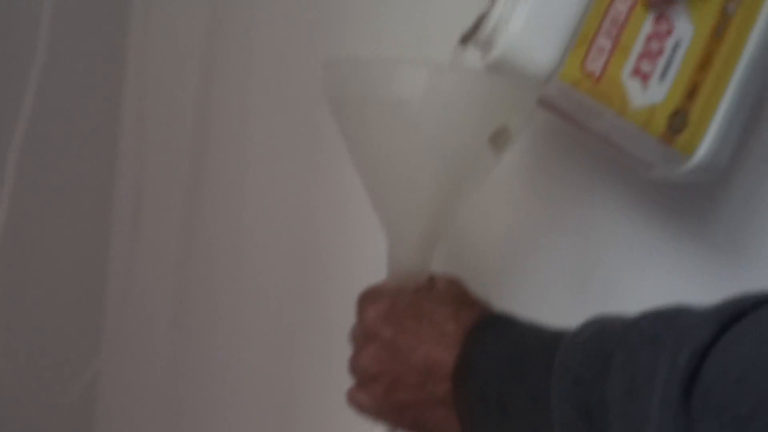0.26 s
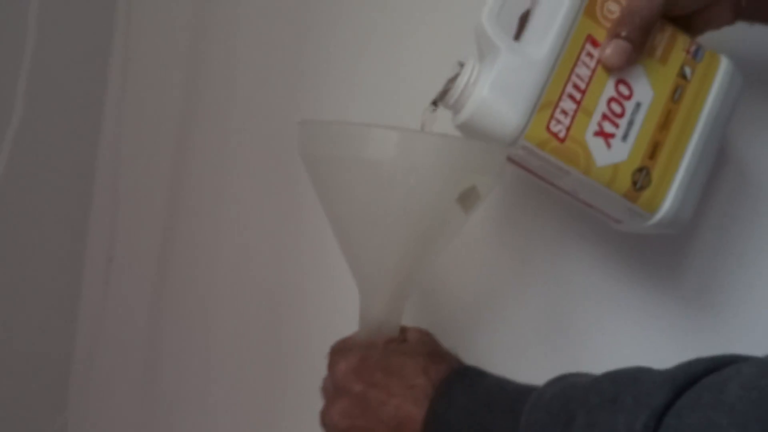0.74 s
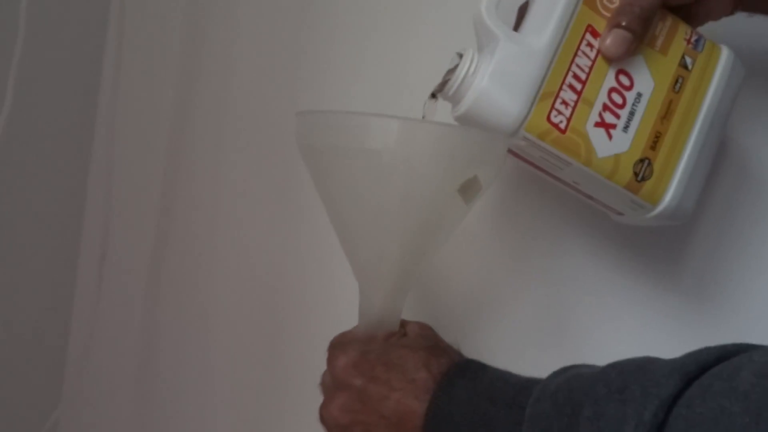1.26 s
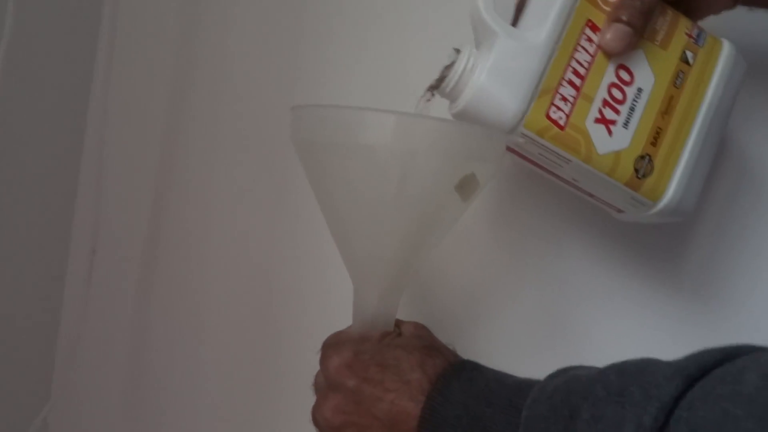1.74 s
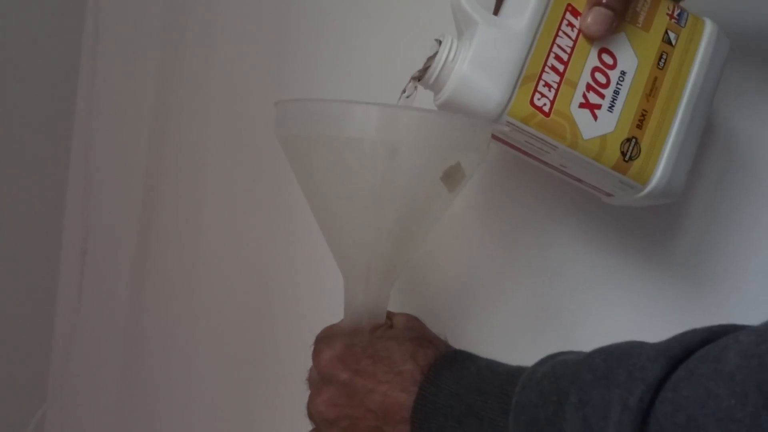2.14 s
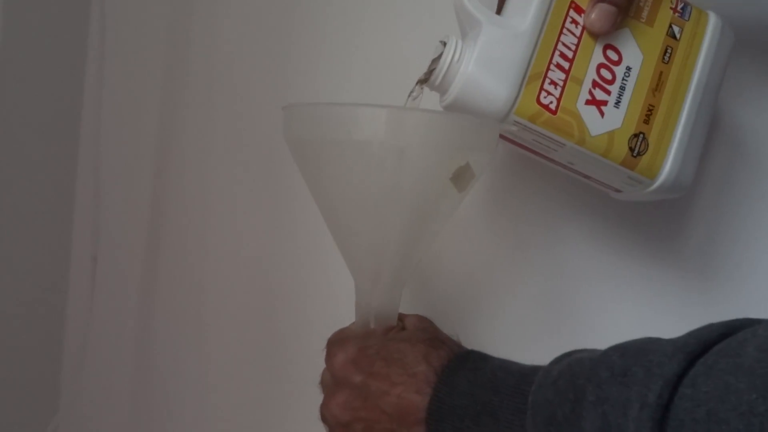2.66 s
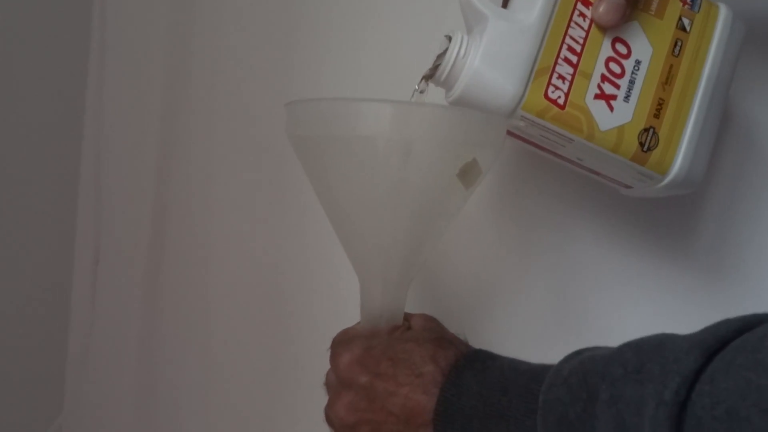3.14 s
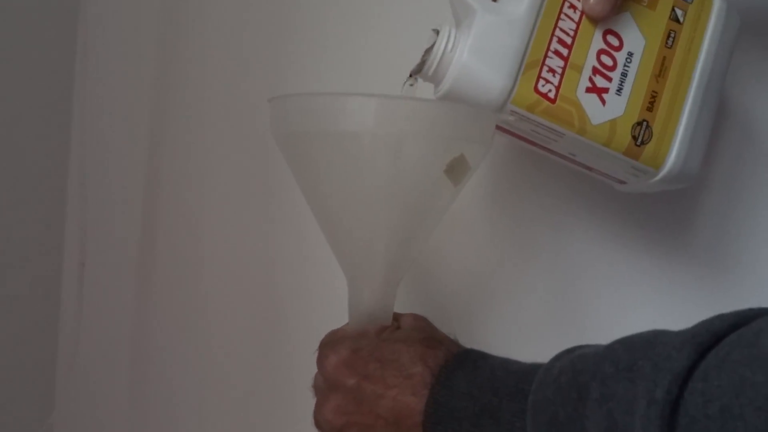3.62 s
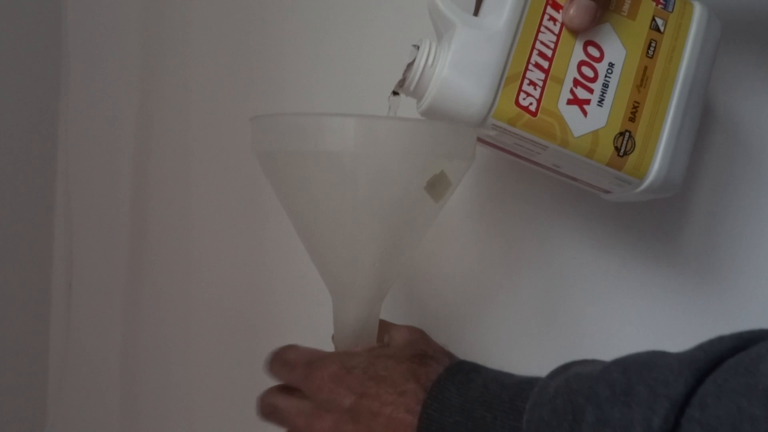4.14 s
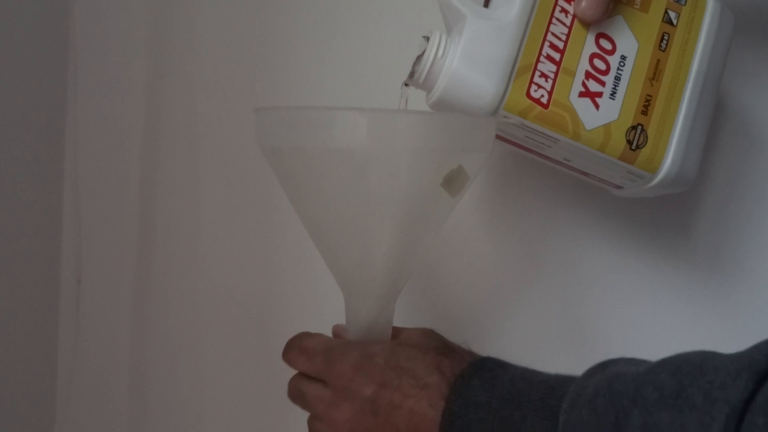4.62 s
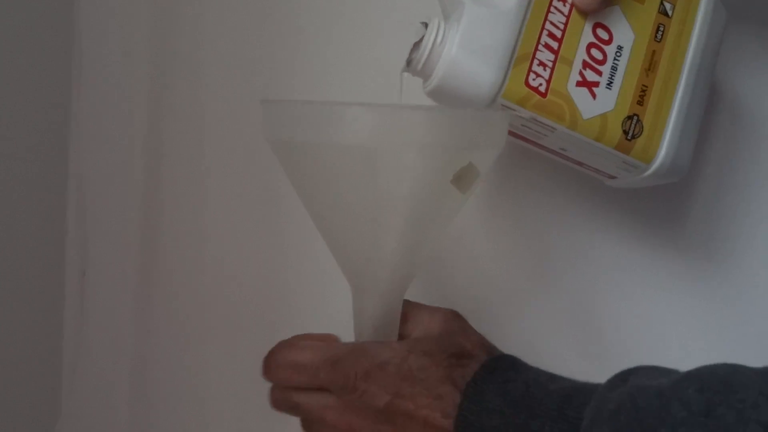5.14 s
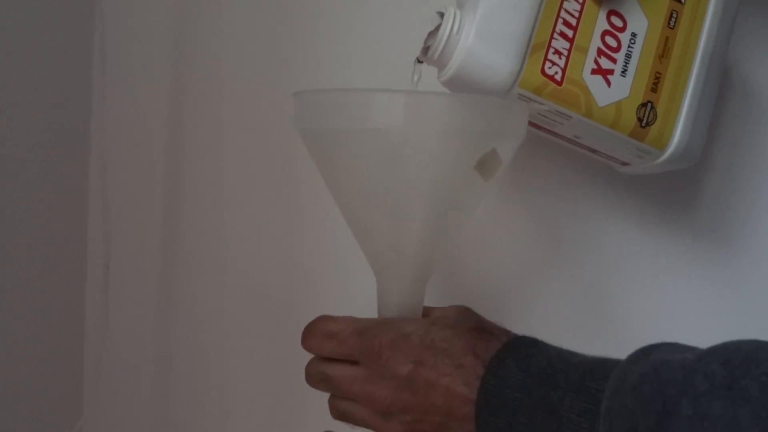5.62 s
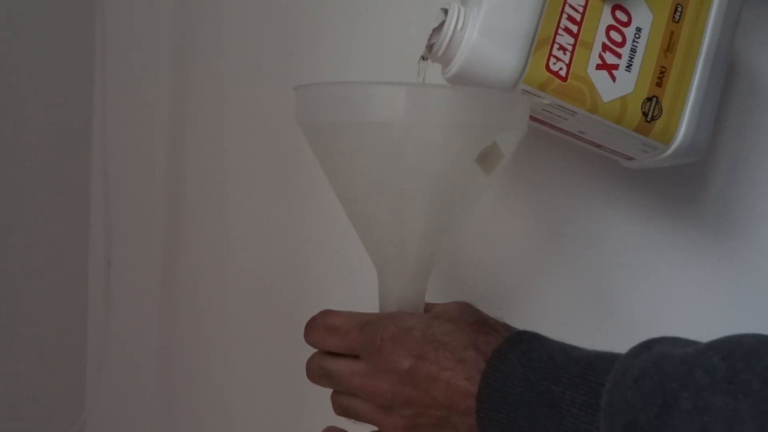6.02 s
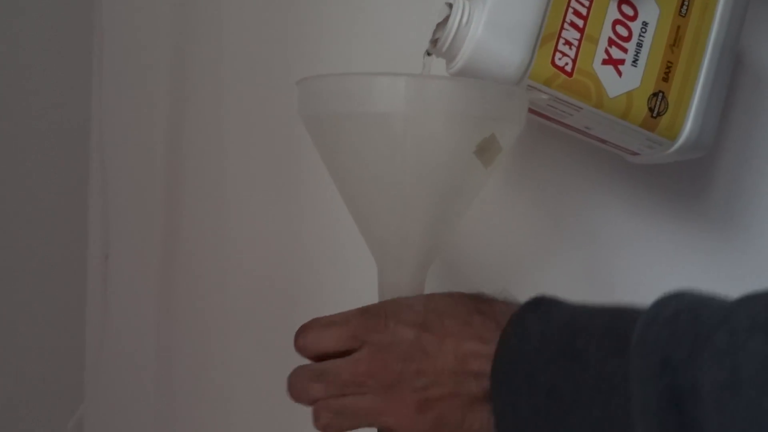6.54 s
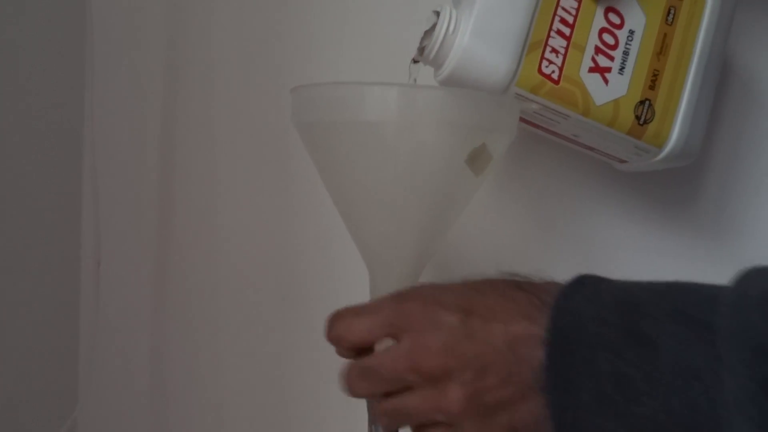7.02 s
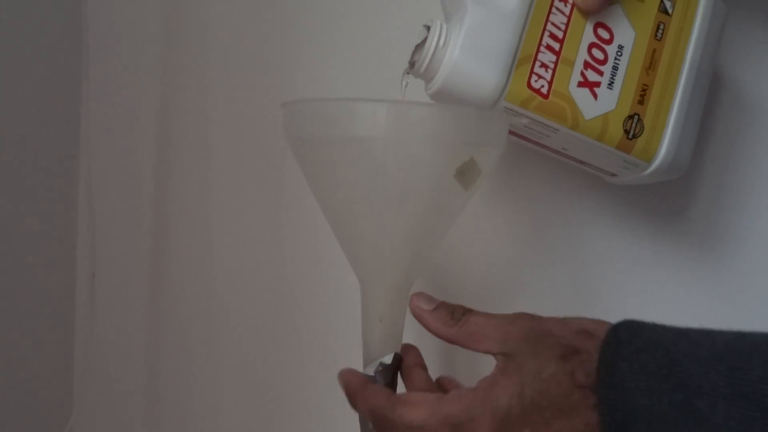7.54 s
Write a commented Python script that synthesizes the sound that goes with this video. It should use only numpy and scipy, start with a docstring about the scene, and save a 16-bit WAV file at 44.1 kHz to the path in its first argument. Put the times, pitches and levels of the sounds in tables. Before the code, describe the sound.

In a small room, close up and almost mono, liquid runs through a thin plastic funnel into a pipe. From 0 to 1 s there is a soft trickle with fine bright ticks and a clearer gulp near 1 s. Sparse bubbling and a steady faint wash continue to 2.7 s, with pings around 2 and 2.3 s and a light hand rub near 2.3. From 2.9 to 3.6 s hollow bubbles quicken into a livelier cluster. A last gurgle comes near 4 s, then dull grip knocks at 4.2-4.4 s. Until 5.3 s it is nearly silent, with only faint gurgles. At 5.4 s air breaks through in the loudest gurgle, with soft low thumps, then dense gulps and crisp plinks run to about 6.6 s. A lull follows; at 7.0-7.5 s shorter glugs, a rub and low nudges return, thinning to scattered drips by 7.8 s.

```python
"""Glugs, gurgles and fine ticking come first: liquid runs from a plastic bottle into a hand-held funnel and down
a pipe into a radiator, in a small room. Bubbles are damped sines, singly or in swarms. Air gulps back up the neck,
stops while the funnel backs up, then breaks through louder. The hand slides and knocks, as shaped noise and short
rings; slugs of liquid nudge low resonances. A wall close by echoes the bubbles, and the microphones hear it nearly mono."""
import sys
import numpy as np
from scipy import signal
from scipy.fft import rfft, irfft, next_fast_len
from scipy.io import wavfile
from scipy.ndimage import map_coordinates

SR = 44100
rng = np.random.default_rng(int(sys.argv[2]) if len(sys.argv) > 2 else 0)


def output_pcm(signal):
    """Save a mono or channel-first signal as 16-bit PCM at the path in sys.argv[1].

    Samples are clipped to [-1, 1] before scaling.
    """
    pcm = np.clip(np.atleast_2d(signal).T, -1, 1) * 32767
    wavfile.write(sys.argv[1], SR, np.round(pcm).astype(np.int16))


N = 343098
TOP_HZ = 15900  # upper band limit


def amp(db):
    """Decibels to gain."""
    return 10 ** (np.asarray(db) / 20)


def unit(x):
    """x at rms 1."""
    return x / np.sqrt(np.mean(x ** 2) + 1e-20)


def along(points, hz):
    """Interpolate (Hz, value) points on a log frequency axis."""
    f, v = np.transpose(points)
    return np.interp(np.log(hz + 1), np.log(f + 1), v)


def curves(rows):
    """One value per sample for each column after the time."""
    s, *cols = np.transpose(rows)
    return [np.interp(np.arange(N) / SR, s, c) for c in cols]


def wobble(rate):
    """A random curve of straight pieces, rate knots a second."""
    knots = rng.standard_normal(int(N * rate / SR) + 4)
    return map_coordinates(knots, [np.arange(N) * rate / SR], order=1)


def envelope(start, length, attack, release, sag_db):
    """A gain that rises, holds with a slight sag, then dies away."""
    t = np.arange(N) / SR - start
    rise = np.clip(t / attack, 0, 1)
    sag = amp(-sag_db * np.clip(t / length, 0, 1))
    return rise * sag * np.exp(-np.maximum(t - length, 0) / release)


def filtered(x, response):
    """x times a complex response of frequency."""
    m = next_fast_len(N + SR // 2)
    return irfft(rfft(x, m) * response(np.fft.rfftfreq(m, 1 / SR)), m)[..., :N]


def coloured(x, spectrum):
    """x shaped by (Hz, dB) points, at rms 1."""
    return unit(filtered(x, lambda hz: amp(along(spectrum, hz))))


def resonance(f, hz, width):
    """Response of one causal resonance, 1 at its centre."""
    return 1j * f * width / (hz * hz - f * f + 1j * f * width)


def add(track, s, sound):
    """Mix a sound into a track at time s."""
    start = int(np.clip(round(s * SR), 0, N - 1))
    track[start:start + len(sound)] += sound[:N - start]


def bubbles(times, gains, hz, cycles, size, swell=1):
    """Damped sines of given peaks: swell and decay are in cycles, size in samples; each rises a little in pitch."""
    turns = hz[:, None] * np.arange(size) / SR
    age = turns / np.reshape(cycles, (-1, 1))
    rise = 1 + .035 * age / (1 + age)
    onset = turns ** 2 / (swell ** 2 + turns ** 2)
    ring = np.sin(2 * np.pi * turns * rise) * np.exp(-age) * onset
    ring *= (gains / (np.abs(ring).max(axis=1) + 1e-9))[:, None]
    where = np.abs(times * SR).astype(int)[:, None] + np.arange(size)
    return np.bincount(where.ravel(), ring.ravel(), N)[:N]


def swarm(hz, spread, cycles, scatter_db, count, size):
    """A stream of short-lived bubbles of random size around a pitch (spread in octaves), at rms 1."""
    times = (np.arange(count) + rng.random(count)) / count * (N - 1) / SR
    pitch, life, strength = rng.standard_normal((count, 3)).T
    centre = np.broadcast_to(hz, N)[(times * SR).astype(int)]
    pitches = np.minimum(centre * 2 ** (spread * np.clip(pitch, -2, 2)), TOP_HZ)
    gains = amp(scatter_db * np.minimum(strength, 1.7))
    return unit(bubbles(times, gains, pitches, cycles * 2 ** (life / 4), size, swell=cycles))


# The quiet air of the place. Each row: frequency in Hz, relative density in dB per Hz.
AIR_SPECTRUM = [(12, -50), (20, -28), (25, -40), (37, -1), (70, -1.5), (98, 0.5), (123, -4.5), (149, 0.5),
                (203, -3), (254, -15), (326, -9), (469, -9.5), (713, -7), (4250, -21), (15800, -31)]


def air():
    """Steady noise in the colour of the quiet air around the microphones."""
    return amp(-57.5) * coloured(rng.standard_normal(N), AIR_SPECTRUM)


# Decay of the small room. Each row: frequency in Hz, time to fall by 60 dB in seconds.
ROOM_DECAY = [(150, 0.55), (1000, 0.35), (4000, 0.49), (12000, 0.05)]


def room(x):
    """A diffuse tail whose highest treble dies first; it changes as the pouring arm moves."""
    hz, t, z = signal.stft(rng.standard_normal((4, SR // 3)), SR, nperseg=256)
    decay = amp(-60 * t / along(ROOM_DECAY, hz)[:, None])
    tails = signal.istft(z * decay, SR, nperseg=256)[1]
    delay = int(0.0044 * SR)
    tails = np.pad(tails / np.linalg.norm(tails[0]), ((0, 0), (delay, 0)))
    # four tails take turns, once round a second
    turn = 2 * np.pi * (np.arange(N) / SR + np.arange(len(tails))[:, None] / len(tails))
    return signal.oaconvolve(x * np.maximum(np.cos(turn), 0), tails, axes=1).sum(axis=0)[:N]


# Surfaces close to the funnel. Each row: echo delay in seconds before the sway, linear gain.
NEAR_WALLS = [(.0022, .12), (.00775, .52), (.0131, .1)]
WALL_DRIFT = .015  # typical share by which the paths change


def walls(x):
    """Near echoes, their paths changing slightly as the funnel sways."""
    path = 1 + WALL_DRIFT * wobble(3)
    return sum(gain * map_coordinates(x, [np.arange(N) - delay * SR * path], order=1)
               for delay, gain in NEAR_WALLS)


# Air columns of funnel and pipe. Each row: resonance in Hz, time to fall by 60 dB in seconds, relative level in dB.
AIR_COLUMNS = [(170, .3, -3), (308, .25, -5), (411, .2, 0), (618, .1, -1), (779, .15, -7), (825, .1, -3),
               (907, .22, 2), (1037, .1, -8), (1194, .15, 1), (1322, .15, 0), (1449, .12, -4),
               (1802, .12, -7), (1927, .12, -5), (2170, .12, -2), (2335, .15, -5), (2543, .12, -3)]
# Bands that the cone swallows. Each row: centre in Hz, width in Hz, share lost at the centre.
CONE_HOLLOWS = [(3045, 150, 0.74), (4110, 180, 0.77)]


def pipe(x):
    """The air columns ring on after each bubble, and the nearest walls throw it back."""
    def columns(f):
        return sum(amp(db + 1.0) * resonance(f, hz, np.log(1000) / (np.pi * t60)) for hz, t60, db in AIR_COLUMNS)

    def hollows(f):
        return sum(lost * resonance(f, hz, width) for hz, width, lost in CONE_HOLLOWS)

    return filtered(x + filtered(x, columns) + walls(x), lambda f: 1 - hollows(f))


# Hand and sleeve sliding on the funnel. Each row: start in seconds, length in seconds, relative level in dB.
HAND_SLIDES = [(2.325, 0.12, -55.5), (2.469, 0.084, -68), (4.347, 0.15, -63.5), (7.29, 0.041, -51)]
# Colour of the rub. Each row: frequency in Hz, relative density in dB per Hz.
RUB_SPECTRUM = [(35, -36), (60, 2), (278, 7), (351, -3), (613, 7), (1450, -5.5), (3500, 2), (5080, -4.5),
                (10700, -6.5), (12500, -17), (15500, -31)]


def rub():
    """Skin and cloth drag over the plastic in fine catches."""
    drag = sum(amp(db) * envelope(s, length, attack=0.038, release=0.029, sag_db=6.5)
               for s, length, db in HAND_SLIDES)
    catches = rng.standard_normal(N) * amp(3 * wobble(500) + 2 * wobble(60))
    return amp(20.5) * drag * coloured(catches, RUB_SPECTRUM)


# Dull knocks as the hand shifts its grip. Each row: start in seconds, relative peak in dB, pitch in Hz.
GRIP_KNOCKS = [(4.24, -30, 884), (4.432, -17.5, 1050), (4.437, -19.5, 1055)]


def knocks():
    """The hand damps the plastic, so each knock dies at once."""
    s, db, hz = np.transpose(GRIP_KNOCKS)
    return bubbles(s, amp(db), hz, cycles=1.7, size=900, swell=1.3)


# Heavy slugs of liquid nudging the funnel. Each row: start in seconds, relative level in dB.
SLUG_THUMPS = [(3.984, -34), (5.364, -16), (5.442, -13.5), (6.302, -28), (6.399, -30), (7.345, -21),
               (7.374, -15), (7.422, -18), (7.441, -18), (7.772, -27)]
# Low resonances of funnel and radiator. Each row: centre in Hz, width in Hz, relative level in dB.
BODY_RESONANCES = [(108, 30, -19), (177, 46, -2), (304, 27, -2.5), (456, 33, 17)]


def thumps():
    """Slugs of liquid push softly and shake the low resonances of funnel and radiator."""
    blows = np.zeros(N)
    push = np.hanning(int(.004 * SR))  # 4 ms
    for s, db in SLUG_THUMPS:
        add(blows, s, amp(db + 42) * push / push.sum())

    def body(f):  # neighbouring resonances have opposite signs
        return sum((-1) ** k * amp(db) * resonance(f, hz, width)
                   for k, (hz, width, db) in enumerate(BODY_RESONANCES))

    return filtered(blows, body)


# Liquid sliding evenly down the cone into the neck. Each row: time in seconds, relative level in dB.
WASH_LEVEL = [(0.0, -54), (0.6, -66), (0.88, -50.5), (1.0, -48), (1.8, -45.5), (2.1, -54.5), (2.5, -42),
              (2.65, -67), (3.6, -57), (3.8, -50), (4.05, -42.5), (4.25, -92), (7.78, -58)]
# Resonances that colour the wash. Each row: centre in Hz, width in Hz, relative level in dB.
NECK_RESONANCES = [(893, 250, 4.5), (1190, 500, -44), (1295, 99, 12), (1970, 1100, 4)]


def wash():
    """Countless faint bubbles merge into a steady wash in the resonances of the neck."""
    wash_db, = curves(WASH_LEVEL)
    grains = swarm(1195, spread=0.73, cycles=0.39, scatter_db=4, count=9000, size=200)
    neck = filtered(grains, lambda f: sum(amp(db) * resonance(f, hz, width) for hz, width, db in NECK_RESONANCES))
    return amp(wash_db) * unit(neck)


# Squeezed air pockets, rising as they shrink. Each row: start in seconds, length in seconds, start pitch in Hz,
# end pitch in Hz, relative level in dB, pitch unsteadiness in octaves.
AIR_SQUEEZES = [(0.109, 0.066, 1510, 2540, -46.5, 0.2), (0.226, 0.23, 1347, 1583, -51.5, .12),
                (1.189, 0.13, 2134, 2600, -44, 0.117), (1.54, 0.09, 1930, 3394, -46, 0.142),
                (1.601, 0.04, 4030, 5270, -48, 0.095), (2.325, 0.047, 3780, 4560, -42, 0.097),
                (2.813, 0.039, 2226, 2320, -47, 0.067), (3.701, 0.074, 218, 810, -47, 0.068),
                (5.327, 0.018, 1810, 1926, -38, 0.034), (5.387, 0.07, 784.6, 1460, -30, 0.066),
                (5.374, 0.12, 2143, 2546, -36, 0.093), (6.287, 0.057, 396, 922, -40.5, 0.038),
                (7.292, 0.02, 826, 1020, -32.5, 0.052), (7.299, 0.044, 1548, 1775, -34, 0.054),
                (7.377, 0.025, 610, 690, -31, 0.038), (7.422, 0.027, 560, 906, -31, 0.043),
                (7.471, 0.071, 792, 969, -41, 0.054), (7.522, 0.28, 938, 1453, -56, 0.12)]


def squeezes():
    """A trapped pocket rings unsteadily and climbs in pitch while liquid closes in on it."""
    track = np.zeros(N)
    for s, length, start_hz, end_hz, db, unsteady in AIR_SQUEEZES:
        u = np.linspace(0, 1, int(length * SR))
        shake, jitter = (map_coordinates(knots, [u * length * 220], mode="mirror")  # 220 knots a second
                         for knots in rng.standard_normal((2, 64)))
        hz = start_hz * (end_hz / start_hz) ** u * 2 ** (unsteady * jitter)
        ring = unit(amp(4 * shake) * np.sin(2 * np.pi * np.cumsum(hz) / SR))
        add(track, s, amp(db) * ring * np.sqrt(np.abs(np.sin(np.pi * u))))
    return track


# Lone bubbles, from deep glugs in the pipe to blips in the neck. Each row: start in seconds, relative peak in dB,
# pitch in Hz.
LONE_BLIPS = [(0.331, -33.5, 2330), (0.546, -43, 2390), (0.636, -39.5, 1230), (0.658, -36.5, 880),
              (1.059, -40, 435), (1.163, -39, 193), (1.259, -25.5, 2200), (1.3, -25.5, 2240),
              (1.325, -34, 2380), (1.364, -38, 208), (1.438, -38.5, 346), (1.578, -39, 450),
              (1.681, -36, 316), (1.756, -38, 344), (1.783, -31, 1230), (2.648, -31.5, 2240),
              (2.685, -36, 2200), (2.713, -34, 2060), (2.838, -31, 2160), (3.089, -27, 1350),
              (3.164, -32, 2440), (3.522, -27, 1390), (3.494, -26, 980), (3.508, -26, 1080),
              (3.562, -24.5, 1120), (2.941, -27.5, 1350), (2.957, -30, 1340), (3.205, -23, 1360),
              (3.256, -25, 1240), (3.316, -22.5, 1400), (3.456, -22.5, 1310), (3.486, -17, 1075),
              (3.501, -23, 2270), (3.969, -26.5, 685), (5.359, -24, 780), (5.375, -24.5, 402),
              (5.388, -19, 725), (5.408, -15, 890), (5.416, -12, 1140), (5.434, -14, 1000),
              (5.44, -19, 1120), (5.447, -22, 625), (5.45, -18.5, 1210), (5.491, -19.5, 840),
              (5.713, -25, 904), (5.748, -20, 1190), (5.821, -22.5, 1430), (6.067, -28, 950),
              (6.143, -26, 1300), (5.861, -20.5, 845), (5.903, -20, 1160), (6.154, -23.5, 850),
              (6.172, -24.5, 615), (6.399, -21.5, 1420), (6.441, -27, 984), (7.033, -29, 2040),
              (7.087, -34, 1260), (7.109, -34, 1450), (7.272, -25.5, 1350), (7.307, -29, 1020),
              (7.344, -25.5, 860), (7.353, -31, 252), (7.372, -24, 291), (7.376, -30, 607),
              (7.383, -22, 670), (7.418, -23, 406), (7.426, -20.5, 594), (7.439, -31, 510),
              (7.487, -24, 820), (7.509, -33, 950)]


def blips():
    """Each lone bubble rings for a few cycles."""
    s, db, hz = np.transpose(LONE_BLIPS)
    return bubbles(s, amp(db), hz, cycles=1.5, size=2400, swell=3.0)


# The stream landing in the funnel. Each row: time in seconds, relative spray level in dB.
STREAM_LEVEL = [(0.0, -57), (0.25, -78), (0.45, -62.5), (1.76, -64), (2.25, -58.5), (2.52, -69),
                (2.68, -59.5), (2.86, -62.5), (3.5, -63.5), (4.08, -62), (4.2, -72.5), (4.45, -65.5),
                (4.62, -88), (5.29, -73.5), (5.42, -54), (6.0, -59), (6.55, -59), (6.68, -64.5),
                (6.96, -75), (7.04, -58.5), (7.17, -68), (7.35, -51.5), (7.78, -71.5)]
# Colour of the fizz. Each row: frequency in Hz, relative filter gain in dB.
FIZZ_SPECTRUM = [(2060, 28), (3500, 7), (3800, 8), (4250, -17), (4550, 0), (5690, -1), (8010, -4.5),
                 (11300, 5), (13300, -13), (15500, -6)]
# Colour of the ticks. Each row: frequency in Hz, relative filter gain in dB.
TICK_SPECTRUM = [(2500, -18), (3800, -7), (4300, -10), (5500, -0.5), (7500, 5), (11200, -2.5), (12200, -20),
                 (15500, -20)]
# The brightest bubbles bursting at the surface, in runs that climb and fall. Each row: start in seconds,
# relative peak in dB, pitch in Hz.
SURFACE_PINGS = [(0.0326, -29, 8600), (0.0535, -24.5, 5630), (0.075, -24, 7700), (0.2405, -28.5, 7770),
                 (0.336, -23.5, 7950), (0.4145, -26, 5340), (0.4294, -28, 8400), (0.4794, -31.5, 6200),
                 (0.549, -27, 6440), (0.598, -32, 10500), (0.6047, -21.5, 8960), (0.6426, -32, 9600),
                 (0.6636, -26.5, 9150), (0.6773, -28, 8100), (0.7, -23, 8000), (0.8917, -31, 7760),
                 (0.9595, -10.5, 7620), (1.0076, -30, 9100), (1.0676, -32, 6860), (1.2033, -28, 10300),
                 (1.267, -34, 7540), (1.4006, -23.5, 5850), (1.4671, -28, 7200), (1.623, -23, 7200),
                 (1.631, -21, 6780), (1.6456, -23, 9900), (1.6661, -24, 9300), (1.932, -31, 3700),
                 (1.9634, -29, 7200), (1.983, -20, 7100), (2.0021, -13, 7220), (2.0218, -30, 5400),
                 (2.0337, -29, 8200), (2.0772, -23, 9000), (2.09, -21, 8860), (2.126, -27, 9300),
                 (2.188, -25, 8400), (2.2049, -24, 8900), (2.2603, -23.5, 7360), (2.29, -20, 6960),
                 (2.3027, -16, 7200), (2.3386, -17.5, 7600), (2.593, -19.5, 8040), (2.597, -30, 3800),
                 (2.621, -27, 5640), (2.688, -29, 3740), (2.6912, -25.5, 8550), (2.733, -28.5, 3630),
                 (2.837, -29, 3800), (2.938, -32, 3720), (2.7763, -27.5, 7100), (2.9222, -27, 6430),
                 (2.95, -25, 5600), (2.979, -20, 8700), (3.0137, -26, 3430), (3.047, -26, 8600),
                 (3.065, -26, 7300), (3.137, -24.5, 3400), (3.2926, -23.5, 10600), (3.3246, -20.5, 9800),
                 (3.3956, -15.5, 8200), (3.431, -26, 7700), (3.488, -11.5, 7680), (3.502, -25, 6150),
                 (3.5528, -22, 9200), (3.609, -24.5, 10600), (3.775, -19, 11000), (3.9538, -30, 7100),
                 (4.045, -30.5, 3620), (4.0627, -30, 7160), (4.266, -38, 3540), (4.2867, -33, 3580),
                 (4.4132, -25.5, 7600), (4.444, -27.5, 8560), (4.755, -51, 3980), (4.885, -47, 6100),
                 (4.99, -43, 5440), (5.451, -28, 7700), (5.471, -16.5, 4900), (5.495, -19, 8140),
                 (5.513, -21.5, 3630), (5.631, -23, 7300), (5.6906, -13.5, 7670), (5.725, -17.5, 3400),
                 (5.837, -27.5, 3530), (5.844, -20.5, 9000), (5.883, -23.5, 3360), (5.9123, -16, 8140),
                 (5.921, -19, 4540), (5.976, -13.5, 3630), (5.9846, -14.5, 6540), (6.1032, -23.5, 7700),
                 (6.1726, -26, 8000), (6.1995, -21, 7200), (6.2123, -10.5, 7750), (6.258, -23, 3660),
                 (6.4095, -27, 7950), (6.5182, -35, 6300), (6.558, -24, 3440), (6.823, -30, 4060),
                 (7.089, -28, 2730), (7.109, -25, 2850), (7.0978, -30, 7800), (7.2228, -19.5, 7380),
                 (7.3085, -19.5, 9500), (7.322, -16.5, 7800), (7.3595, -16, 8400), (7.513, -21.5, 7850),
                 (7.6855, -19, 7670), (7.7462, -21.5, 3260)]


def spray(surge):
    """The stream beats in tiny bubbles: a fine fizz, ticks, and bright pings, each amid a few much weaker ones."""
    spray_db, = curves(STREAM_LEVEL)
    fizz = swarm(8080, spread=0.55, cycles=1.7, scatter_db=5, count=7000, size=110)
    fizz = coloured(fizz, FIZZ_SPECTRUM)
    tick_hz = 7750 * 2 ** (0.18 * wobble(14))  # wanders as the stream moves about the cone
    ticks = swarm(tick_hz, spread=.18, cycles=2.8, scatter_db=7, count=1400, size=220)
    ticks = coloured(ticks, TICK_SPECTRUM)
    s, db, hz = np.transpose(SURFACE_PINGS)
    ping_cycles = 4.6 * 2 ** (.8 * rng.uniform(0.11, 1, len(s)))
    pings = bubbles(s, amp(db - 2.5), hz, cycles=ping_cycles, size=500, swell=0.28)
    # four weak bubbles per ping, from 3 ms before it to 12 ms after
    late, pitch, weak = rng.uniform(-0.24, 1, (len(s), 3, 4)).transpose(1, 0, 2)
    around = s[:, None] + 0.012 * late
    weak_gain = amp(db[:, None] - 16 + 5 * weak)
    weak_hz = hz[:, None] * 2 ** (.3 * pitch)
    cluster = bubbles(around.ravel(), weak_gain.ravel(), weak_hz.ravel(), cycles=3, size=300, swell=1)
    rings = amp(spray_db + 5.2 * surge + 6) * ticks + pings + cluster
    softened = filtered(rings, lambda f: 1 / (1 + (f / 11800) ** 24))
    return amp(spray_db + 5.36 * surge + 7.5) * fizz + softened


# The strongest gulps of air. Each row: start in seconds, reference level in dB, deep bubble in dB and middle bubble
# in dB relative to it before the layer trims, middle bubble pitch in Hz.
AIR_GULPS = [(0.127, -33.5, 0.5, 3, 1260), (0.704, -29, -5, -0.5, 1260), (0.83, -40, -7, 10.5, 1200),
             (0.982, -19, -17, -3.5, 1230), (1.059, -25, -8.5, -5, 1230), (1.614, -30.5, -2.5, 2, 1220),
             (1.688, -16, -20, -9.5, 1250), (1.976, -22, -20, -8, 1270), (2.856, -18.5, -27, -13, 1330),
             (2.897, -29.5, -29, 4, 1315), (3.004, -20, -37, -3.5, 1410), (3.06, -17.5, -31, -4.5, 1510),
             (3.106, -12, -32, -9.5, 1320), (3.177, -14.5, -47, 1.5, 1460), (3.288, -23, -4.5, 0, 1180),
             (3.356, -19.5, -36, 2, 1390), (3.379, -12.5, -47, -7, 1270), (3.423, -9, -47, 1.5, 1327),
             (3.48, -15, -13.5, -1.5, 1370), (3.533, -12, -50, -7, 1120), (3.551, -19.5, -21, -3, 1270),
             (3.777, -18.5, -1.5, 3.5, 1254), (3.99, -18, -11, 0, 1245), (5.368, -14.5, -3, -22, 1190),
             (5.407, -10, -4, 0, 1100), (5.459, -6, -25, 0.5, 1600), (5.475, -0.5, -36, -11, 1760),
             (5.534, -17.5, -2, -5, 1180), (5.586, -26.5, 7.5, -20, 1300), (5.622, -10.5, -44, 0, 1700),
             (5.682, -2, -9.5, -22, 1280), (5.759, -12, -16, 0.5, 1610), (5.878, -13.5, -4.5, -24, 1170),
             (5.929, -13.5, -7, 2.5, 1430), (5.953, -5.5, -6, -4, 1520), (5.999, -11.5, -30, -2, 1550),
             (6.113, -7.5, -9, 0, 1480), (6.164, -8, -16, -2, 1140), (6.194, -7.5, -15, -11, 1600),
             (6.241, -8, -20, -8.5, 1460), (6.357, -15, -7, -20, 1220), (6.406, -24, 1.5, 0, 1400),
             (6.481, -16, -12.5, -7, 1270), (6.509, -13.5, -21, -7, 1370), (6.571, -21.5, -18, 2, 1505),
             (6.823, -27.5, -5.5, -34, 1300), (7.067, -18, -28, -7.5, 1098), (7.219, -19, -13, -7, 1410),
             (7.289, -16, -1.5, -15, 1140), (7.423, -25, 8.5, -16, 1200), (7.44, -20, 4.5, -14, 990),
             (7.616, -20.5, -44, 2, 1614), (7.771, -21, -5, -22, 1070)]
DEEP_HZ, SMALL_HZ, SIZE_SPREAD_OCT = 912, 2058, 0.11  # typical deep and small bubbles, and how much they vary


def gulps():
    """Each gulp breaks into a deep, a middle and a small bubble, amid a brief spatter of finer ones."""
    s, db, deep_db, middle_db, middle_hz = np.transpose(AIR_GULPS)
    deep_size, small_size = 2 ** (SIZE_SPREAD_OCT * rng.standard_normal((len(s), 2)).T)
    deep = bubbles(s, amp(db + deep_db), DEEP_HZ * deep_size, cycles=2.37, size=1400, swell=1.7)
    middle = bubbles(s, amp(db + middle_db - 4.5), middle_hz, cycles=2.2, size=900, swell=3.0)
    small = bubbles(s, amp(db - 18.5), SMALL_HZ * small_size, cycles=4.3, size=700, swell=4.4)
    late, fine, strength = rng.random((len(s), 3, 16)).transpose(1, 0, 2)
    octaves = 2.75 * fine  # above the middle bubble
    spatter_db = db[:, None] - 14.5 - 5 * octaves - 8 * strength
    spatter_s = s[:, None] + .014 * late ** 2  # within 14 ms
    spatter_hz = middle_hz[:, None] * 2 ** octaves
    spatter = bubbles(spatter_s.ravel(), amp(spatter_db).ravel(), spatter_hz.ravel(), cycles=2.2, size=300)
    return deep + middle + small + spatter


# Spells in which liquid drains down the pipe. Each row: start in seconds, length in seconds, relative levels of
# deep glugs, gurgle and splash in dB, neck pitch at the start and at the end in Hz, glug pitch in Hz.
DRAIN_SPELLS = [(0.0, 0.098, -43.5, -48.5, -45, 1300, 1220, 525),
                (0.218, 0.77, -47.5, -56.5, -56.5, 1280, 1080, 579),
                (0.966, 0.93, -45.5, -45.5, -59, 1344, 1200, 267),
                (1.905, 0.79, -48.5, -49.5, -55.5, 1164, 1145, 236.6),
                (2.823, 0.1, -55, -53, -53, 1370, 1200, 237), (2.91, 0.23, -57, -44, -46, 1450, 1380, 232),
                (3.163, 0.29, -85, -39.5, -49, 1430, 1180, 287),
                (3.479, 0.1, -85, -38, -42, 1140, 1050, 287),
                (3.785, 0.33, -43, -46.5, -53, 1020, 1016, 347),
                (4.378, 0.082, -53, -40.5, -42.5, 870, 1010, 216),
                (4.866, 0.2, -54, -60, -68.5, 830, 780, 273),
                (5.158, 0.25, -57.5, -58.5, -67, 920, 900, 265),
                (5.32, 0.05, -44, -53, -39.5, 900, 1010, 284),
                (5.383, 0.13, -29.5, -23, -34.5, 870, 1460, 517),
                (5.57, 0.696, -34.5, -41, -39, 914, 1065, 544),
                (6.258, 0.37, -48, -40, -42, 853, 1300, 276),
                (6.603, 0.13, -41, -48.5, -57, 1310, 1010, 354),
                (6.992, 0.16, -59, -44, -49.5, 1060, 980, 340),
                (7.225, 0.075, -66, -38.5, -37.5, 960, 1160, 338),
                (7.3, 0.063, -65, -41, -36.5, 1010, 906, 310), (7.38, 0.15, -44, -35.5, -45, 733, 910, 283),
                (7.503, 0.19, -56, -46, -49, 1060, 1260, 310)]


def draining():
    """Spells set in fast and weaken as the head of liquid drops; the neck's pitch glides through each."""
    # gains of glugs, gurgle and splash
    gains = sum(amp(row[2:5])[:, None] * envelope(row[0], row[1], attack=0.0038, release=0.026, sag_db=2.5)
                for row in DRAIN_SPELLS)
    start, length, *_, first_hz, last_hz, glug_hz = np.transpose(DRAIN_SPELLS)
    t = np.arange(N) / SR
    now = np.maximum(np.searchsorted(start, t) - 1, 0)
    progress = np.clip((t - start[now]) / length[now], 0, 1)
    neck_hz = first_hz[now] * (last_hz / first_hz)[now] ** progress
    return gains, neck_hz, glug_hz[now]


def trickle(surge):
    """Big bubbles churn in the pipe, middle ones ring with the neck, small ones splash and plink in the cone."""
    (glug_gain, gurgle_gain, splash_gain), neck_hz, glug_hz = draining()
    glugs = swarm(glug_hz, spread=0.436, cycles=2.1, scatter_db=4.5, count=1300, size=1800)
    gurgle = swarm(neck_hz, spread=0.24, cycles=1.87, scatter_db=8.5, count=2600, size=800)
    # the splash's bubbles shrink and grow with those in the neck
    splash = swarm(1.92 * neck_hz, spread=0.29, cycles=1.45, scatter_db=7.0, count=3800, size=400)
    plinks = swarm(3535, spread=0.17, cycles=3.5, scatter_db=4, count=500, size=600)
    small = splash + amp(-13) * plinks
    pipe_and_neck = amp(-8.5) * glug_gain * glugs + amp(-3.5) * gurgle_gain * gurgle
    return amp(3.2 * surge) * (pipe_and_neck + amp(-3.0) * splash_gain * small)


# Room sound that differs between the two microphones. Each row: frequency in Hz, filter gain in dB.
STEREO_WIDTH = [(30, -48), (100, -31.5), (400, -18.5), (1500, -16), (8000, -16), (13000, -16.5)]
SIDE_WALL_S, SIDE_WALL_DB = .0031, -2.5  # a surface to one side makes the ears differ; level before the width filter


def scene():
    """Pipe and surface sounds in the room, nearly mono, over quiet air."""
    surge = wobble(36)  # the uneven stream drives the trickle and the spray together
    deep = pipe(trickle(surge) + gulps() + blips() + squeezes()) + wash() + thumps() + knocks()
    surface = spray(surge) + rub()
    bright = surface + amp(-5.5) * walls(surface)
    wet = amp(-11.5) * deep + amp(-14.0) * bright
    mid = deep + bright + room(wet) + air()
    glance = amp(SIDE_WALL_DB) * filtered(deep + bright, lambda f: np.exp(-2j * np.pi * f * SIDE_WALL_S))
    side = room(wet) + glance + amp(10.5) * air()
    side = filtered(side, lambda hz: amp(along(STEREO_WIDTH, hz)))
    return np.array([mid + side, mid - side]) * amp([[.2], [-.2]])  # left a touch louder


def record(dry):
    """The microphones keep nothing above their band limit."""
    return filtered(dry, lambda hz: hz < TOP_HZ)


dry = scene()
out = record(dry)
output_pcm(out)
```